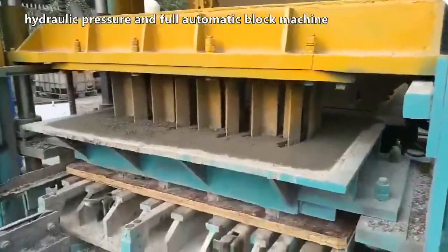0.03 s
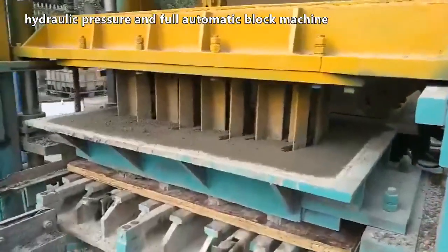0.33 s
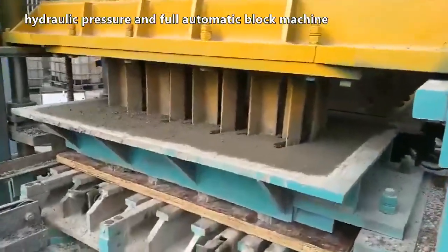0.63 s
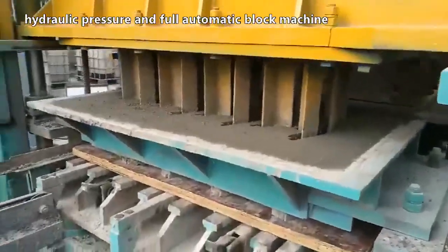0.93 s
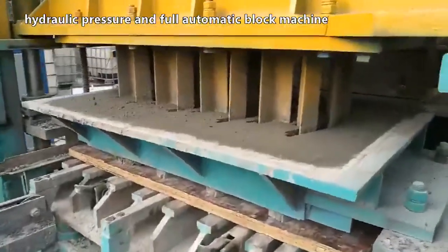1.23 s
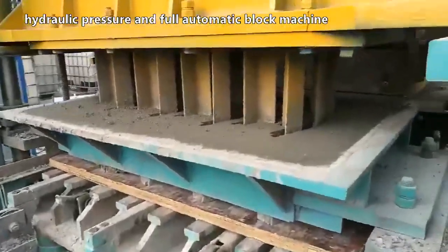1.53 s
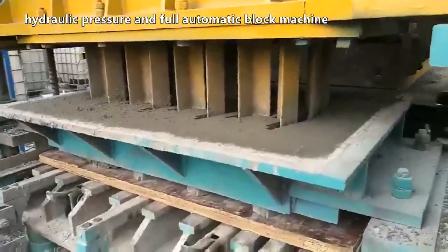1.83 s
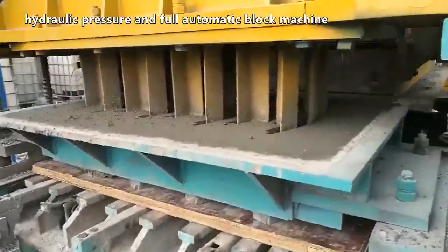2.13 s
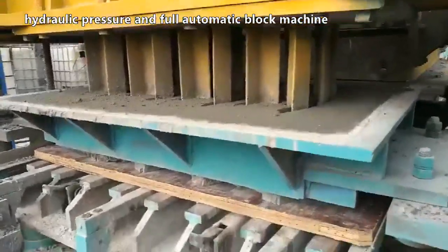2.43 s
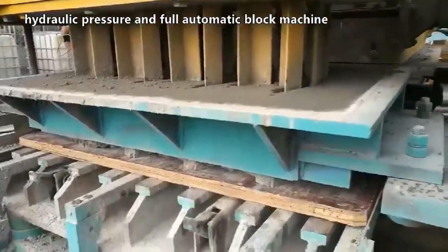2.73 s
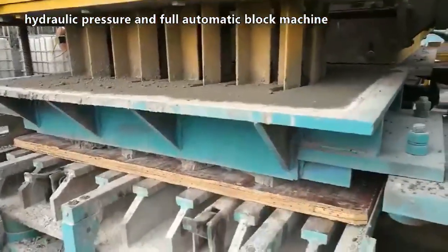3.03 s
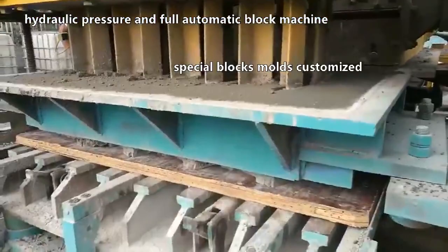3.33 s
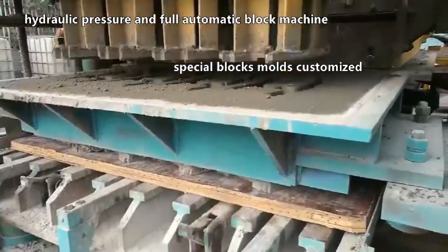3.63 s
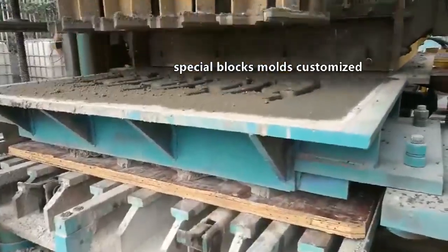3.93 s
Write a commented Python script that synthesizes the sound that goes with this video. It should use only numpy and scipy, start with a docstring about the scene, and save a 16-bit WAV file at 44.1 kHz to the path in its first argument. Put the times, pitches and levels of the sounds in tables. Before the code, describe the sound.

A concrete block machine vibrates with a loud hammering drone, close by outdoors. It winds down into loose rattling, steel clanks and a thin squeal, then a valve hisses and the mould lifts with a hum and dull knocks.

```python
"""A concrete block machine, heard outdoors from close by on a stereo microphone, the plant's din behind it.
Its vibrator shakes the steel mould, which hammers in a pattern that repeats every two turns.
After a second the vibrator coasts down: the hammering breaks up into loose rattling and single clanks,
and sliding steel squeals. Then a valve hisses, the hydraulics hum and the mould lifts with dull knocks."""
import sys
import numpy as np
from scipy import signal
from scipy.fft import rfft, irfft
from scipy.io import wavfile

SR = 44100
rng = np.random.default_rng(int(sys.argv[2]) if len(sys.argv) > 2 else 0)


def wav_record(signal):
    """Record a signal, one row per channel, as 16-bit PCM in the file named by sys.argv[1]."""
    frames = np.transpose(np.atleast_2d(signal))
    bounded = np.clip(frames, -1, 1)
    # unit amplitude maps onto the largest positive 16-bit level
    quanta = np.round(bounded * 32767).astype(np.int16)
    wavfile.write(sys.argv[1], SR, quanta)


N = 176400
T = np.arange(N) / SR


def from_db(db):
    """Decibels to amplitude."""
    return 10 ** (np.asarray(db) / 20)


def rms_one(x):
    """Scale to an rms of 1."""
    return x / np.sqrt(np.mean(x ** 2) + 1e-20)


def in_time(rows):
    """Join (seconds, value) rows with straight lines."""
    return np.interp(T, *np.transpose(rows))


def at_hz(rows, hz):
    """Read (Hz, value) rows along a log frequency axis."""
    row_hz, values = np.transpose(rows)
    return np.interp(np.log(hz + 1e-9), np.log(row_hz), values)


def ramp(middle_s, length_s):
    """A straight rise from 0 to 1."""
    return np.clip(.5 + (T - middle_s) / length_s, 0, 1)


def swell(start_s, length_s):
    """A rounded rise and fall."""
    return np.sin(np.pi * np.clip((T - start_s) / length_s, 0, 1))


def drift(rate_hz):
    """A slow random wander with rms 1."""
    hz = np.fft.rfftfreq(N, 1 / SR)
    return rms_one(irfft(rfft(rng.standard_normal(N)) / (1 + (hz / rate_hz) ** 2) ** 2, N))


# Width at the microphone. Each row: frequency in Hz, side against mid in dB.
WIDTH = [(60, -95), (190, -12.5), (380, -6.5), (700, 0), (1290, -5.5), (2380, 1.5), (8000, -0.5)]
# Lean at the microphone. Each row: frequency in Hz, left against right in dB.
BALANCE = [(400, -3), (700, 0.5), (1290, -4), (2380, -4), (4400, 0.5), (8120, 5), (14000, 3)]
LEFT_RIGHT = np.array([[1], [-1]])


def noise(colour, size=N, t60=np.inf):
    """Stereo noise of a given colour, steady or dying away, wider towards the treble; rms 1."""
    hz = np.fft.rfftfreq(size, 1 / SR)
    white = rng.standard_normal((2, size)) * from_db(-60 * T[:size] / t60)
    mid, side = np.exp(1j * np.angle(rfft(white)))
    pair = mid + LEFT_RIGHT * from_db(at_hz(WIDTH, hz)) * side
    pair *= from_db(LEFT_RIGHT * at_hz(BALANCE, hz) / 2)
    low_cut = 1 / np.sqrt(1 + (.8 * colour[0][0] / (hz + 1)) ** 8)
    return rms_one(irfft(pair * from_db(at_hz(colour, hz)) * low_cut, size))


def body(clicks, colour, t60, size=4096, onset=48):
    """Clicks strike a body with countless modes that die away together."""
    ring = np.roll(noise(colour, 2 * size, t60), onset, axis=1)[:, :size]
    ring *= np.sin(np.pi / 2 * np.minimum(np.arange(size) / onset, 1)) ** 2
    return signal.fftconvolve(clicks[None], ring / np.sqrt(np.sum(ring ** 2) / 2), axes=1)[:, :N]


def click_train(times, sizes):
    """Clicks of given sizes at given times in seconds."""
    out = np.zeros(N)
    inside = (times >= 0) & (times < T[-1])
    np.add.at(out, (times[inside] * SR).astype(int), sizes[inside])
    return out


def chatter(blows, length_s, count=14):
    """Each blow is a short, weakening run of contacts of random sign."""
    starts, db = np.transpose(blows)
    draw = rng.random((len(starts), 2, count))
    late = (np.arange(count) + draw[:, 0] * (np.arange(count) > 0)) / count
    signs = np.sign(draw[:, 1] - .5)
    sizes = from_db(db)[:, None] * (1 - late / 2) * signs * np.sqrt(2 * length_s * SR / count)
    return click_train((starts[:, None] + length_s * late).ravel(), sizes.ravel())


# The plant behind the machine. Each row: time in seconds, level in dB.
PLANT_LEVEL = [(0, -26.5), (1.5, -33), (2.3, -35.5), (2.7, -37), (3.1, -41), (3.3, -41), (3.55, -44.5),
               (4, -46.5)]
# Its spectrum. Each row: frequency in Hz, relative level in dB.
PLANT_SPECTRUM = [(40, -1), (200, 0.5), (330, -11.5), (520, -13), (650, -4), (740, -7), (880, 0),
                  (1100, -7), (1600, 2), (2100, -3.5), (3500, -10.5), (6800, -30.5), (15500, -41)]


def plant_din(flutter_db=1.37):
    """The din of the plant flutters and falls away."""
    return from_db(in_time(PLANT_LEVEL) + flutter_db * drift(rate_hz=59)) * noise(PLANT_SPECTRUM)


# The frame's rumble at the microphone. Each row: time in seconds, level in dB.
RUMBLE_LEVEL = [(0, -30), (1.2, -32.5), (1.6, -40.5), (2.3, -43.5), (2.8, -49), (3.2, -51), (3.5, -59.5),
                (4, -59)]
# Its spectrum. Each row: frequency in Hz, relative level in dB.
RUMBLE_SPECTRUM = [(25, -15), (50, -4.5), (130, 0), (260, 0), (450, -3.5), (2000, -44)]


def frame_rumble(lumps_db=1.0):
    """The frame gives off a low, lumpy noise."""
    return from_db(in_time(RUMBLE_LEVEL) + lumps_db * drift(rate_hz=15)) * noise(RUMBLE_SPECTRUM)


# The valve's hiss. Each row: frequency in Hz, relative level in dB.
VALVE_SPECTRUM = [(1500, 5), (4000, 2.5), (6500, -0.5), (10000, -6), (15000, -22)]


def hydraulics(valve_db=-41.5, pump_db=-50.5, pump_hz=213):
    """The valve hisses briefly, then the pump hums as it takes the load."""
    hiss = from_db(valve_db) * swell(start_s=3.11, length_s=.2) * noise(VALVE_SPECTRUM)
    hum = np.sqrt(2) * from_db(pump_db + drift(rate_hz=6.1)) * np.sin(2 * np.pi * pump_hz * T)
    return hiss + hum * ramp(middle_s=3.1815, length_s=.023)


# Knocks of the rising mould. Each row: start in seconds, level in dB.
LIFT_KNOCKS = [(3.174, -39), (3.205, -39), (3.246, -41), (3.293, -41), (3.395, -51), (3.538, -39),
               (3.644, -47), (3.765, -49), (3.845, -44.5), (3.973, -42)]
# Their spectrum. Each row: frequency in Hz, relative level in dB.
KNOCK_SPECTRUM = [(200, -4), (500, -18), (900, -5), (1150, -5), (1600, -2), (2100, -16), (4000, -27),
                  (8000, -38), (15000, -46)]


def lift_knocks():
    """The mould knocks dully on its way up."""
    return body(chatter(LIFT_KNOCKS, length_s=.02), KNOCK_SPECTRUM, t60=.11)


# Sliding steel. Each row: start and length in seconds, pitch and width in Hz, level in dB.
SQUEALS = [(1.85, 0.93, 8870, 95, -54), (2.846, 0.16, 8400, 650, -56), (3.126, 0.16, 1615, 260, -35),
           (3.33, 0.13, 8770, 600, -57.5), (3.8, .08, 8600, 700, -62)]


def squeals():
    """Steel slides on steel with a narrow, unsteady whistle."""
    out = 0
    for start, length, hz, width, db in SQUEALS:
        band_hz = hz + width * np.array([-2, -.5, 0, .5, 2])
        band_db = [-60, -8, 0, -8, -60]
        out += from_db(db) * swell(start, length) * noise(np.c_[band_hz, band_db])
    return out


CLANK_S = .022   # length of a clank's run of contacts


def ringing(modes, blows, gain_db=-3, spread_db=2, after_db=-8.5):
    """Each blow and its after-contacts set steel modes ringing, every mode with a strength of its own."""
    out = np.zeros((2, N))
    starts, blow_db = np.transpose(blows)
    for hz, db, t60 in modes:
        decay, angle = from_db(-60 / (t60 * SR)), 2 * np.pi * hz / SR
        resonator = [0, np.sin(angle)], [1, -2 * decay * np.cos(angle), decay ** 2]
        for channel, sign in enumerate((1, -1)):
            weak, late = rng.standard_normal((len(starts), 2)).T
            first = click_train(starts + np.abs(late) / hz, from_db(blow_db - spread_db * weak))
            after = from_db(after_db) * chatter(blows, CLANK_S) / np.sqrt(2 * CLANK_S * SR)
            gain = from_db(db + gain_db + sign * at_hz(BALANCE, hz) / 2)
            out[channel] += gain * signal.lfilter(*resonator, first + after + 1e-18)
    return out


# Loose fittings collide. Each row: start in seconds, crash level in dB, relative ring level in dB.
FITTING_HITS = [(0.003, -45, -29.5), (.115, -28.5, -28), (0.249, -32, -28), (.295, -27, -28),
                (.43, -41, -40), (1.115, -44, -31), (1.15, -40, -30), (1.186, -35, -24.5),
                (1.32, -26.5, -34), (1.362, -48, -39), (1.47, -26.5, -27), (1.51, -34, -25.5),
                (1.65, -44, -32), (2.295, -40, -34), (2.3885, -33, -46), (2.504, -35, -37.5),
                (2.5617, -32, -43), (2.8593, -42.5, -61), (2.895, -45, -68), (2.9306, -45, -45),
                (3.0448, -43, -62), (3.0834, -43, -63)]
# The crash. Each row: frequency in Hz, relative level in dB.
CRASH_SPECTRUM = [(800, 3), (2500, 2.5), (5000, 9.5), (7000, -1), (9500, 2.5), (12500, -16), (15500, -23)]
# The fittings' modes. Each row: frequency in Hz, relative level in dB, t60 in seconds.
FITTING_MODES = [(4550, -1.5, .15), (4900, 2, 0.23), (4924, 1.5, 0.37), (6400, -6, 0.27), (6702, -1, 0.24),
                 (9420, -2, 0.19), (9860, -8.5, 0.35)]


def fitting_clanks():
    """Steel fittings collide with a bright crash and ring on."""
    starts, crash_db, ring_db = np.transpose(FITTING_HITS)
    crash = body(chatter(np.c_[starts, crash_db], CLANK_S), CRASH_SPECTRUM, t60=.046)
    return crash + ringing(FITTING_MODES, np.c_[starts, ring_db])


# The mould box against its guides. Each row: start in seconds, relative level in dB.
GUIDE_HITS = [(1.265, -31), (1.365, -27.5), (1.478, -26.5), (1.515, -22), (1.603, -24), (1.68, -32.5),
              (1.748, -31)]
# The box's modes. Each row: frequency in Hz, relative level in dB, t60 in seconds.
MOULD_MODES = [(872, 3, .5), (1265, -1, .35), (3693, 5, .3), (4317, -5, .17), (6702, -4, .25)]


def mould_clanks():
    """The mould box strikes its guides and rings lower than the fittings."""
    return ringing(MOULD_MODES, GUIDE_HITS)


# The rattle at the microphone. Each row: time in seconds, level in dB.
RATTLE_LEVEL = [(0, -30), (.32, -28.5), (.45, -28.5), (1.05, -30), (1.2, -24.5), (1.4, -21.5),
                (1.65, -23.5), (1.82, -39), (2.2, -38.5), (2.31, -32.5), (2.37, -36.5), (2.6, -41.5),
                (2.75, -51.5), (3.2, -46), (3.35, -54.5), (4, -64)]
# Its spectrum. Each row: frequency in Hz, relative level in dB.
RATTLE_SPECTRUM = [(250, -2), (440, -40), (620, -13), (870, 1), (2400, 0), (4400, -2.5), (4900, 2),
                   (5700, -5.5), (7500, -11), (9800, -13), (12500, -23.5), (15500, -24)]


def rattle(turns, parts=3, hits_per_s=900, spread_db=.5):
    """Several loose parts jump at random, hardest once in each turn."""
    out = 0
    shake = 1 + .13 * np.cos(2 * np.pi * turns)
    for _ in range(parts):
        hits = rng.random(N) < hits_per_s / parts / SR
        sizes = from_db(-spread_db * np.minimum(rng.exponential(1, N), 3)) * rng.choice([-1, 1], N)
        clicks = rms_one(hits * sizes * shake) * from_db(in_time(RATTLE_LEVEL))
        out += body(clicks, RATTLE_SPECTRUM, t60=.13)
    return out / np.sqrt(parts)


# The vibrator's shaft. Each row: time in seconds, speed in turns per second.
SHAFT_SPEED = [(0, 79.1), (.97, 79.1), (1.04, 76.9), (1.15, 72.0), (1.29, 64.7), (1.38, 61.6), (2.01, 46.2),
               (2.21, 40.5), (2.53, 34.0), (2.8, 29.6), (4, 12)]


def shaft(slam_s=.776):
    """The shaft's speed, its turns counted from one slam, and its coasting: 1 from half speed down."""
    speed = in_time(SHAFT_SPEED)
    turns = np.cumsum(speed) / SR
    coasting = np.clip(2 * (1 - speed / speed[0]), 0, 1)
    return speed, turns - np.interp(slam_s, T, turns), coasting


# Multiples 1 to 5 of the speed sweep through the frame's resonances, one list for each.
# Each row: time in seconds, level in dB.
DRONE_LEVELS = [
    [(0, -29.5), (1.25, -35), (2.1, -44), (2.7, -55), (3.1, -67)],
    [(0, -13), (1.11, -13.5), (1.25, -25.5), (1.52, -36), (1.75, -32.5), (2.02, -32), (2.22, -44),
     (2.5, -61), (3, -86)],
    [(0, -24), (1.08, -22.5), (1.28, -37), (1.58, -42.5), (1.7, -30.5), (2, -30), (2.36, -36),
     (2.55, -42.5), (2.75, -45.5), (3, -81)],
    [(0, -31), (.9, -24), (1.25, -34.5), (1.65, -44), (2.05, -49), (2.2, -37), (2.36, -32.5), (2.55, -51),
     (3, -79)],
    [(0, -30), (1.06, -26), (1.17, -42), (2.03, -51.5), (2.17, -36), (2.36, -41), (2.6, -60), (3, -67)],
]
# Multiples 6 to 12 buzz together. Each row: time in seconds, level in dB before the frame's response.
BUZZ_LEVEL = [(0, -63), (1.15, -35.5), (1.5, -39.5), (2.25, -44), (2.6, -56), (3.1, -79)]
# The frame's response to the buzz. Each row: frequency in Hz, gain in dB.
FRAME_RESPONSE = [(240, -4), (290, 1.5), (340, -14.5), (440, 0), (520, -13), (800, -17)]
# The bouncing mould. Each row: multiple of the speed, dB against the hammering on loose, on packed mix.
BOUNCE_TONES = [(2.5, -14, -22), (3.5, -16, -19), (4.5, -19, -44), (5.5, -14.5, -17.5), (11, -14, -26),
                (13, -20, -17), (16, -24, -11.5), (18, -16, -18), (18.5, -16.5, -18.5)]


def drone(speed, turns, coasting, packed):
    """The unbalanced shaft shakes the table at multiples of its speed; the bouncing mould adds tones."""
    waver_db = .24 + 1.1 * coasting   # rougher as the shaft slows
    levels_db = [in_time(rows) for rows in DRONE_LEVELS]
    levels_db += [in_time(BUZZ_LEVEL) + at_hz(FRAME_RESPONSE, k * speed) for k in range(6, 13)]
    tones = [(k, from_db(db + waver_db * drift(rate_hz=30))) for k, db in enumerate(levels_db, 1)]
    bounce = from_db(in_time(HAMMER_FORCE)) * (1 - ramp(middle_s=1.2, length_s=.2))
    for multiple, loose_db, packed_db in BOUNCE_TONES:
        tones.append((multiple, bounce * ((1 - packed) * from_db(loose_db) + packed * from_db(packed_db))))
    out = 0
    for multiple, level in tones:
        stereo_phase = np.arctan(from_db(at_hz(WIDTH, multiple * speed))) * LEFT_RIGHT
        lag = 2 * np.pi * rng.random() * (multiple > len(DRONE_LEVELS))
        out += np.sqrt(2) * level * np.sin(2 * np.pi * multiple * turns + stereo_phase - lag)
    return out


# The mould's hammering, close to the microphone. Each row: time in seconds, relative force in dB.
HAMMER_FORCE = [(0, -19.5), (.65, -19.5), (.8, -18.5), (1.1, -18), (1.22, -28.5), (1.62, -34.5),
                (1.8, -34.5), (2.2, -35.5), (2.6, -42), (3, -43), (4, -75)]
# One contact's spectrum. Each row: frequency in Hz, relative level in dB.
HAMMER_SPECTRUM = [(300, -13.5), (440, 6), (600, -7), (870, -0.5), (1400, 1), (2000, 0), (2600, -7.5),
                   (3400, -14), (4900, -10), (6200, -18.5), (9500, -25.5), (13000, -37)]


def hammering(speed, turns, coasting, share, lesser=6, slam_db=3, rebound_db=1, uneven_db=1.63):
    """A slam, its rebound and lesser contacts return every two turns, each at its own spot on the mould."""
    offsets = np.r_[0, 1, 2 * (np.arange(lesser) + rng.random(lesser)) / lesser]   # in turns
    forces = from_db(np.r_[slam_db, rebound_db, np.zeros(lesser)])
    cycles = 2 * np.arange(-40, 80)
    level = from_db(in_time(HAMMER_FORCE) - .5) * np.sqrt(share * 2 * SR / speed / np.sum(forces ** 2))
    jitter_s = .00003 + .0009 * coasting   # the contacts stray as the shaft slows
    out = 0
    for offset, force in zip(offsets, forces):
        late, strong = rng.standard_normal((2, len(cycles)))
        times = np.interp(cycles + offset, turns, T, left=-1, right=-1)
        times += np.interp(times, T, jitter_s) * late
        clicks = level * click_train(times, force * from_db(uneven_db * strong))
        out += body(clicks, HAMMER_SPECTRUM, t60=.054)
    return out


def scene():
    """One shaft drives drone, hammering and rattle; the hammering changes pattern as the mix packs."""
    speed, turns, coasting = shaft()
    packed = ramp(middle_s=.56, length_s=.12)
    on_loose = hammering(speed, turns, coasting, share=1 - packed)
    on_packed = hammering(speed, turns, coasting, share=packed)
    shaking = on_loose + on_packed + drone(speed, turns, coasting, packed) + rattle(turns)
    steel = fitting_clanks() + mould_clanks() + squeals()
    return shaking + steel + hydraulics() + lift_knocks() + plant_din() + frame_rumble()


def record(dry, cutoff_hz=15800):
    """The microphone signal has its highest peaks rounded and its top cut."""
    rounded = dry / (1 + dry ** 8) ** (1 / 8)
    return signal.sosfilt(signal.ellip(10, .1, 80, cutoff_hz, fs=SR, output="sos"), rounded)


dry = scene()
out = record(dry)
wav_record(out)
```